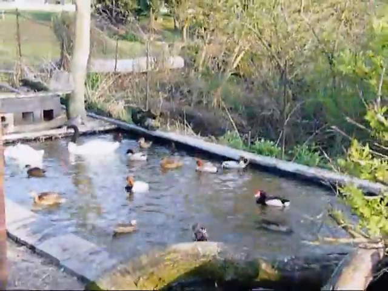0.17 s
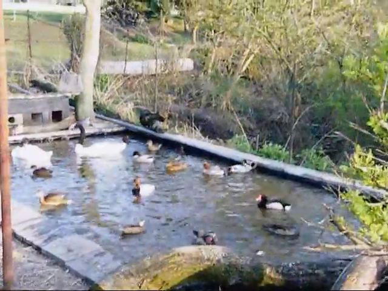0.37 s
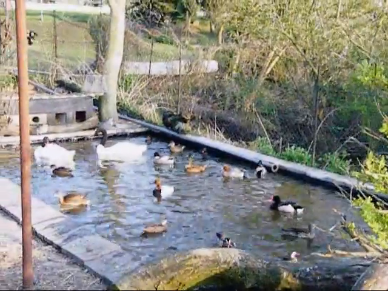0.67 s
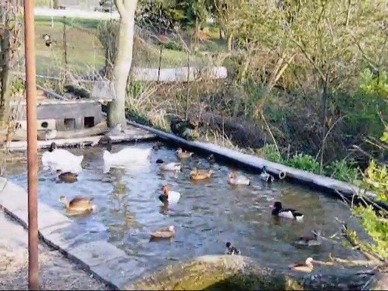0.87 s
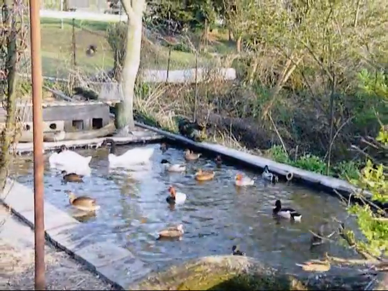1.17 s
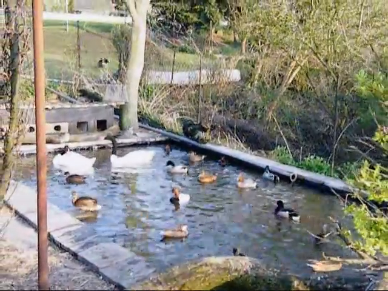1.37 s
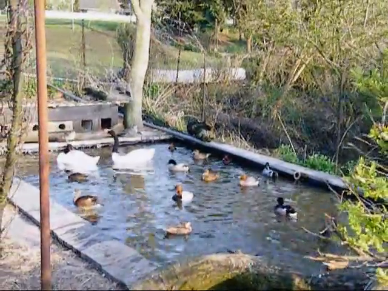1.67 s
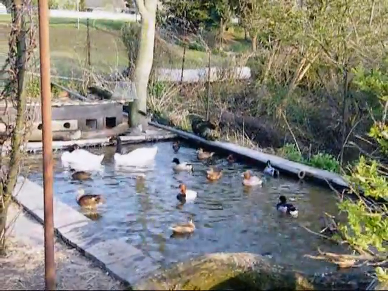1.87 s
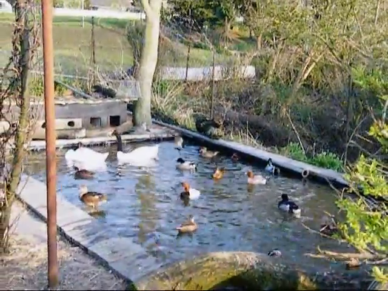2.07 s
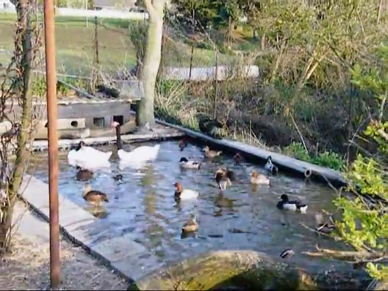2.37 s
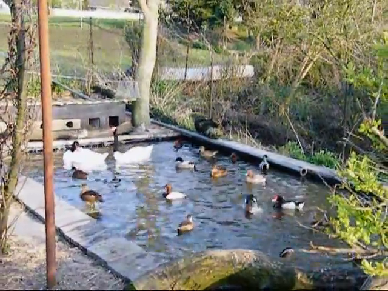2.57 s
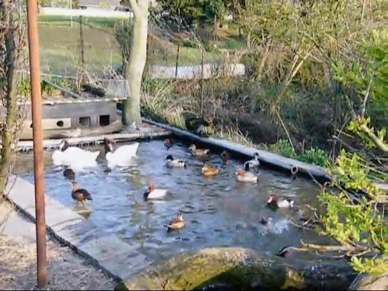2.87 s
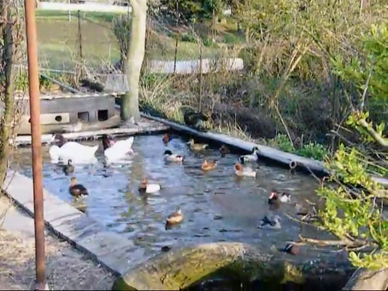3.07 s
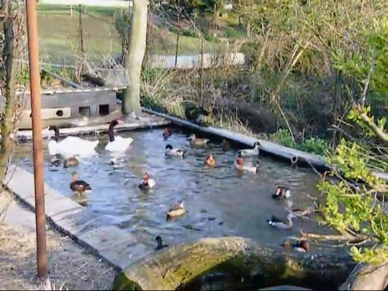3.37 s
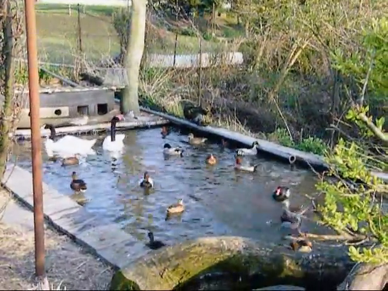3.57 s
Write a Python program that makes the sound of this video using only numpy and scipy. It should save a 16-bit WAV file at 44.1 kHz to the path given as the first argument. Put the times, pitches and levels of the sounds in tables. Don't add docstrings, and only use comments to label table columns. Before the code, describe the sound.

Short duck clucks on a rippling pond, wings slapping water, with traffic rushing steadily behind

```python
import sys
import numpy as np
from scipy import signal
from scipy.io import wavfile
from scipy.ndimage import uniform_filter1d

SR = 44100
rng = np.random.default_rng(int(sys.argv[2]) if len(sys.argv) > 2 else 0)


def to_wav(sig):
    pcm = np.clip(np.atleast_2d(sig), -1, 1) * 32767
    pcm = np.round(pcm).astype(np.int16)
    wavfile.write(sys.argv[1], SR, pcm.T)


def gain_from_decibels(decibels):
    exponent = np.asarray(decibels, float) / 20
    return 10 ** exponent


N = 164052

# (frequency [Hz], level per Hz [dB])
FAR_SPECTRUM = [(35, -78), (60, -14), (88, -17.5), (421, -3.5), (569, -7), (966, -4), (1640, -17),
                (2180, -6.5), (5500, -38.5), (7150, -72), (12100, -120)]
# (time [s], level [dB])
FAR_LEVEL = [(0.0, -41.5), (0.23, -40.5), (0.45, -38.5), (2.47, -40.5), (2.91, -38), (3.12, -36.5),
             (3.72, -40.5)]
# (frequency [Hz], level per Hz [dB])
TYRE_SPECTRUM = [(300, -32), (600, -9), (900, -1.5), (1300, 0), (1900, -3.5), (2500, -17.5), (3300, -15),
                 (5600, -28)]
# (time [s], level [dB], ground-echo crest [Hz])
CAR_PASS = [(0, -29, 1920), (.27, -26, 1860), (.4, -30, 2090), (.68, -30, 2380), (.9, -27, 1780),
            (1.1, -25.5, 1550), (1.35, -22.5, 1300), (1.7, -21.5, 1230), (2.0, -20, 1187),
            (2.2, -22.5, 1470), (2.55, -21.5, 1580), (2.75, -23.5, 1560), (3, -22, 1490),
            (3.3, -22.5, 1940), (3.45, -23, 1500), (3.72, -22, 1640)]
# (time [s], level [dB])
ENGINE_HUM = [(0, -66), (.25, -46), (1, -47.5), (1.75, -46), (2.05, -60), (2.75, -60), (2.95, -45.5),
              (3.4, -48.5), (3.72, -54)]
# (start [s], length [s], level [dB], centre [Hz], width [Hz])
TYRE_DRONES = [(0, 0.76, -33.5, 1258, 109), (.35, 0.5, -40, 2135, 200), (0.951, 1.8, -31.5, 883, 130),
               (1.098, 0.53, -28, 1355, 111), (1.5, 0.66, -32, 1203, 130), (1.95, 0.28, -26.5, 1586, 163),
               (2.401, 0.34, -27, 1610, 200), (2.72, 0.91, -29, 1232, 89), (2.751, 0.29, -29.5, 1556, 130),
               (2.851, 0.9, -36.5, 908, 120), (3.1, 0.25, -29.5, 1820, 198), (1.3, 1, -39.5, 3190, 450),
               (2.281, 0.49, -44, 4110, 450), (.85, .35, -33.5, 1560, 201)]
# (time [s], level [dB])
RIPPLE_LEVEL = [(0, -44.5), (.3, -43.5), (.6, -45.5), (1.1, -45), (1.5, -43), (2.2, -52), (2.6, -48),
                (2.9, -43), (3.3, -37), (3.72, -39.5)]
# (start [s], peak [dB], second partial [Hz], first partial [dB], third partial [dB])
CLUCKS = [(0.036, -17, 3217, -3.5, -6.5), (0.087, -20, 3160, 0, -2.5), (0.3424, -16, 3206, -1.5, -4),
          (0.3905, -19, 3213, 1, 0.5), (0.6934, -17, 3170, -0.5, -2), (0.7223, -28, 2860, 5, -9),
          (0.738, -27.5, 2810, 5, -18), (1.1877, -18, 3175, 2, -4.5), (1.249, -20, 3197, -1, 3),
          (2.108, -20, 3100, 5.5, -7.5), (3.4163, -18, 3080, 1, -13)]
# (start [s], length [s], level [dB], from [Hz], to [Hz])
WHISTLES = [(0.109, 0.025, -37, 3240, 2870), (0.137, 0.028, -37, 4340, 4050),
            (.158, 0.0087, -32.5, 4120, 3380), (.168, 0.019, -36, 3450, 3470),
            (0.183, 0.053, -35, 3450, 2960), (1.13, 0.025, -36, 3600, 3400),
            (1.143, 0.015, -28.5, 3800, 4620), (1.165, .011, -31, 4480, 3600),
            (1.208, 0.031, -35, 3700, 3230), (1.233, 0.015, -32, 3250, 3730),
            (1.29, 0.023, -35, 3580, 3510), (2.946, 0.034, -33.5, 3950, 4350),
            (2.976, 0.013, -32, 3600, 3320), (2.982, 0.014, -42, 3390, 4000),
            (2.992, 0.041, -33, 3410, 2915), (3.593, 0.015, -28.5, 3420, 4500),
            (3.607, .022, -32, 4100, 3360), (3.67, 0.022, -35, 3120, 3610)]
# (start [s], length [s], level [dB], centre [Hz], width [Hz])
RASPS = [(0.41, 0.013, -24, 1180, 200), (.446, 0.0081, -35.5, 4820, 400), (0.738, 0.018, -43, 4600, 700),
         (2.77, 0.25, -41.5, 5200, 1800), (.215, 0.0056, -36, 4600, 360), (3.635, .016, -34, 4200, 470),
         (3.355, 0.029, -38, 3000, 300), (2.31, 0.0098, -38, 4050, 300), (.205, 0.064, -43, 4300, 790),
         (1.511, 0.061, -35.5, 4560, 1000), (1.53, 0.051, -31, 2000, 270), (1.52, 0.039, -33, 2740, 303),
         (2.335, 0.052, -39, 4200, 985), (2.488, 0.016, -43, 5140, 440), (2.915, .03, -38, 4930, 1700),
         (3.176, 0.028, -34, 3830, 900)]
# (start [s], peak [dB], spray centre [Hz])
SLAPS = [(2.7613, -30, 4800), (2.775, -29, 4500), (2.7847, -25, 5000), (2.7967, -26, 4900),
         (2.809, -30, 5100), (2.836, -27, 4600), (2.8523, -23, 4360), (2.864, -25, 4900),
         (2.896, -23, 5200), (2.914, -20, 5300), (2.922, -17, 3800), (2.937, -27, 5150),
         (2.9818, -30, 4200), (2.9943, -16, 4200), (3.003, -30, 5240), (3.0342, -25, 5100),
         (3.0511, -29, 4520), (3.0611, -34, 4500), (2.493, -27, 5200), (2.358, -27, 3800),
         (2.452, -30, 4580), (3.364, -30, 4600)]
# (delay [s], level [dB])
RIM_ECHOES = [(.008, -9), (.0112, -11.5), (.015, -16), (.021, -20)]
# (time [s], frequency [Hz])
BAND_TOP = [(0, 12720), (.9, 12830), (2, 12600), (3.72, 12600)]


def evened(x):
    return x / np.sqrt(np.mean(x ** 2) + 1e-20)


def smooth_noise(shape, size):
    return evened(uniform_filter1d(rng.standard_normal(shape), size=size, axis=0))


def read(points, hz):
    f, value = np.transpose(points)
    return np.interp(np.log(hz + 1), np.log(f + 1), value, right=-90)


def curve(table, t, index=1):
    rows = np.array(table)
    return np.interp(t, rows[:, 0], rows[:, index])


def add(mix, s, sound):
    part = mix[max(round(s * SR), 0):][:len(sound)]
    part += sound[:len(part)]


def resonate(x, hz, width):
    turn = np.exp(2j * np.pi * hz * np.arange(len(x)) / SR)
    r = np.exp(-np.pi * width / SR)
    smoothed = signal.lfilter([(1 - r) ** 2], [1, -2 * r, r * r], x / turn)
    return 2 * (turn * smoothed).real


def rush(field_db, patchy_db, flicker_db):
    frames = N // 128 + 6
    hz = np.fft.rfftfreq(512, 1 / SR)[:, None]
    a, b, patches = rng.standard_normal((frames, 257, 3)).T
    patches = uniform_filter1d(patches, size=4, axis=0)
    patches = evened(uniform_filter1d(patches, size=22, axis=1))
    flicker = smooth_noise(frames, 4)
    shape = field_db(hz, np.arange(frames) * 128 / SR)
    shape = shape - 10 * np.log10(np.sum(gain_from_decibels(shape) ** 2, axis=0))
    z = (a + 1j * b) * gain_from_decibels(shape + patchy_db * patches + flicker_db * flicker)
    return evened(signal.istft(z, nperseg=512, noverlap=384)[1][:N])


def far_road():
    wash = rush(lambda hz, s: read(FAR_SPECTRUM, hz) + 0 * s, patchy_db=1.0, flicker_db=-1.46)
    return wash * gain_from_decibels(7 + curve(FAR_LEVEL, np.arange(N) / SR))


def car():
    def tyre_field(hz, s):
        octaves_off = np.log2((hz + 1) / curve(CAR_PASS, s, index=2))
        return read(TYRE_SPECTRUM, hz) + 3.5 * np.exp(-(octaves_off / 0.32) ** 2)

    roar = rush(tyre_field, patchy_db=1.12, flicker_db=-0.76)
    return roar * gain_from_decibels(curve(CAR_PASS, np.arange(N) / SR))


def engine_hum():
    t = np.arange(N) / SR
    drift = 1 + .004 * smooth_noise((N, 2), 6000).T
    low, high = np.sin(2 * np.pi * np.cumsum(drift * [[202], [298.1]], axis=1) / SR)
    lines = high + gain_from_decibels(-5) * low * np.clip(2 - t, 0, 1)
    return np.sqrt(2) * gain_from_decibels(curve(ENGINE_HUM, t)) * lines


def tyre_drones():
    out = np.zeros(N)
    for row in TYRE_DRONES:
        add(out, *rasp(*row))
    return out


def ripples():
    drips_per_s, spread_db = 5000, 1.5
    size = gain_from_decibels(spread_db * np.minimum(rng.exponential(1, N), 5))
    size *= rng.random(N) < drips_per_s / SR
    kind = rng.integers(0, 24, N)
    out, u = np.zeros(N), np.linspace(0, 1, 90)
    for k, hz in enumerate(np.geomspace(2620, 5360, num=24)):
        ring = np.sin(2 * np.pi * hz * (1 + 0.041 * u) * u * 90 / SR)
        bubble = u * np.exp(-5.5 * u) * ring
        out += signal.oaconvolve(size * (kind == k), bubble)[:N]
    return evened(out) * gain_from_decibels(curve(RIPPLE_LEVEL, np.arange(N) / SR))


def cluck(start, peak_db, hz, first_db, third_db):
    length, sag, rise, fall = .0083, .055, .002, .003
    t = np.arange(0, length + .004, 1 / SR)
    first_hz = hz / 2 * (1 + sag * (.5 - (t / length) ** 1.32))
    phase = 2 * np.pi * np.cumsum(first_hz) / SR
    shape = np.sin(np.pi / 2 * np.clip(t / rise, 0, 1)) ** 2
    shape *= np.clip((length - t) / fall + .5, 0, 1)
    stack = -gain_from_decibels(first_db) * np.cos(phase) - np.cos(2 * phase)
    stack -= gain_from_decibels(third_db - 380.0 * t) * np.cos(3 * phase)
    return start, gain_from_decibels(peak_db - .3) * shape * stack


def whistle(start, length, level_db, from_hz, to_hz):
    warble, warble_hz, grain_depth = .02, 130, .22
    u = np.arange(0, length, 1 / SR) / length
    hz = from_hz + (to_hz - from_hz) * u
    hz = hz * (1 + warble * np.sin(2 * np.pi * warble_hz * u * length))
    grain = 1 + grain_depth * smooth_noise(2500, 90)[:len(u)]
    tone = np.sin(2 * np.pi * np.cumsum(hz) / SR)
    return start, grain * np.sqrt(2) * gain_from_decibels(level_db) * np.sin(np.pi * u) ** .6 * tone


def rasp(start, length, level_db, hz, width):
    noise = rng.standard_normal(70000)[:round(length * SR)]
    swell = np.sin(np.linspace(0, np.pi, len(noise))) ** 0.59
    return start, gain_from_decibels(level_db) * swell * evened(resonate(noise, hz, width))


def wing_slaps():
    t60, width_hz = 0.035, 2100
    out, t = np.zeros(N), np.arange(2000) / SR
    for start, peak_db, hz in SLAPS:
        spray = evened(resonate(rng.standard_normal(2000), hz, width_hz))
        attack = np.minimum(t / 0.00086, 1)
        add(out, start, spray * attack * gain_from_decibels(peak_db - 7.5 - 60 * t / t60))
    return out


def yard(x):
    low_hz, tail_db, t60 = 4300, -21, .12
    taps, t = np.zeros(SR // 4), np.arange(SR // 4) / SR
    for delay, level_db in RIM_ECHOES:
        taps[round(delay * SR)] = gain_from_decibels(level_db)
    taps = signal.sosfilt(signal.butter(8, low_hz, "high", fs=SR, output="sos"), taps)
    tail = rng.standard_normal(SR // 4) * (t > .008) * gain_from_decibels(-60 * t / t60)
    tail = gain_from_decibels(tail_db) * tail / np.linalg.norm(tail)
    return x + signal.fftconvolve(x, taps + tail)[:N]


def scene():
    road = far_road() + car() + engine_hum() + tyre_drones()
    water = ripples()
    birds = np.zeros(N)
    for voice, table in ((cluck, CLUCKS), (whistle, WHISTLES), (rasp, RASPS)):
        for row in table:
            add(birds, *voice(*row))
    return (yard(birds) + water + wing_slaps() + road)[None]


def coarse_sampling(x):
    hold, step = 4, 1 / 256
    return np.repeat(np.round(x[:, ::hold] / step) * step, hold, axis=1)[:, :N]


def calls_standing_out(z, hz, near):
    call = abs(z[0] * (near < 2600)).max(axis=0)
    masked = uniform_filter1d(1. * (call > gain_from_decibels(11) * np.median(call)), size=9) > .1
    road = uniform_filter1d((abs(z[0]) ** 2 * (hz < 2400)).sum(axis=0), size=90)
    masked = masked * (road < gain_from_decibels(2 * -2.5) * np.median(road))
    return uniform_filter1d(1. * masked, size=5)


def thinned(x):
    hz, t, z = signal.stft(x, SR, nperseg=1024, noverlap=768)
    hz = hz[:, None]
    jumps = np.sign(rng.standard_normal((len(t) // 14 + 1, 2)))
    sway = 130 * np.repeat(jumps, 14, axis=0)[:len(t)].T
    below_gap = 10660 + sway[0] / 2 - hz
    above_gap = hz - 11350 - sway[1]
    keep = np.clip((curve(BAND_TOP, t) - hz) / 90, 0, 1)
    keep = keep * np.clip(np.maximum(below_gap, above_gap) / 40, 0, 1)
    near = abs(hz - SR / 8)
    keep = keep * (1 - .74 * calls_standing_out(z, hz, near) * np.clip((260 - near) / 100, 0, 1))
    a, b = rng.standard_normal((len(t), len(hz), 2)).T
    depth, treble = .2, hz > 4000
    blur = (1 + depth * (a + 1j * b) * treble) / np.sqrt(1 + 2 * depth ** 2 * treble)
    return signal.istft(z * keep * blur, SR, nperseg=1024, noverlap=768)[1][:, :N]


def band_limit(x):
    return signal.sosfilt(signal.butter(12, 12890, fs=SR, output="sos"), x)


def record(dry):
    heard = signal.sosfilt(signal.butter(6, 98, "high", fs=SR, output="sos"), dry)
    mix = thinned(coarse_sampling(heard)) - .0039
    return band_limit(mix)


dry = scene()
out = record(dry)
to_wav(out)
```